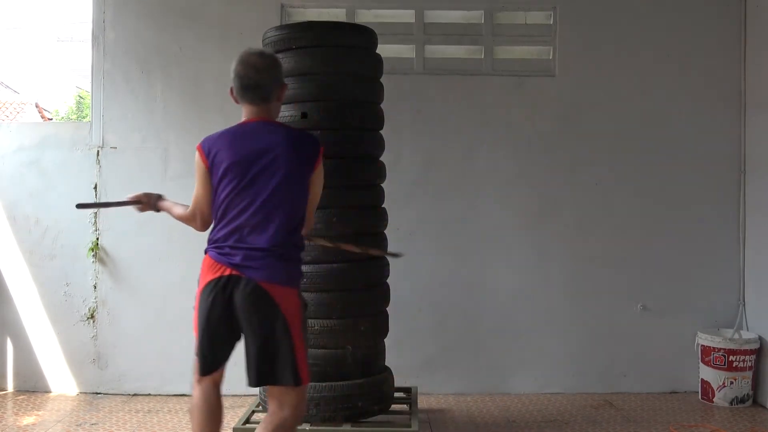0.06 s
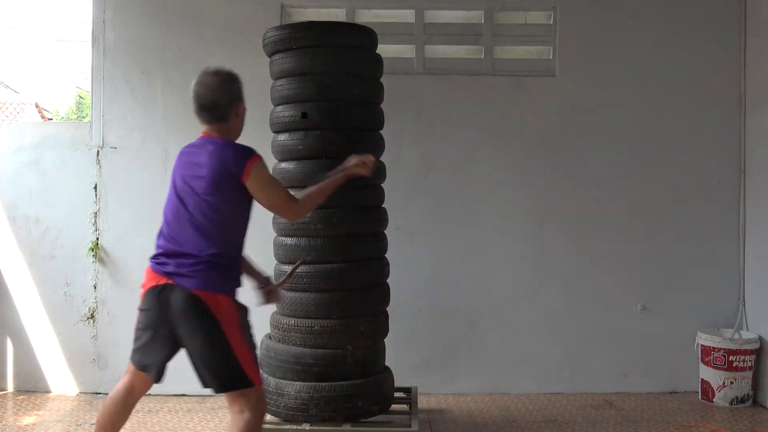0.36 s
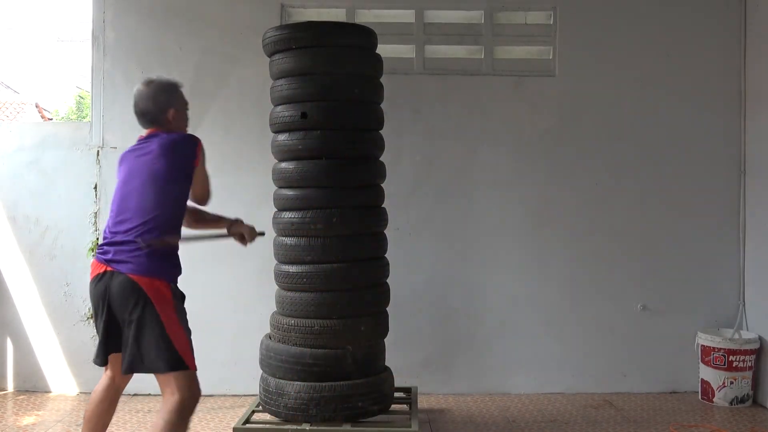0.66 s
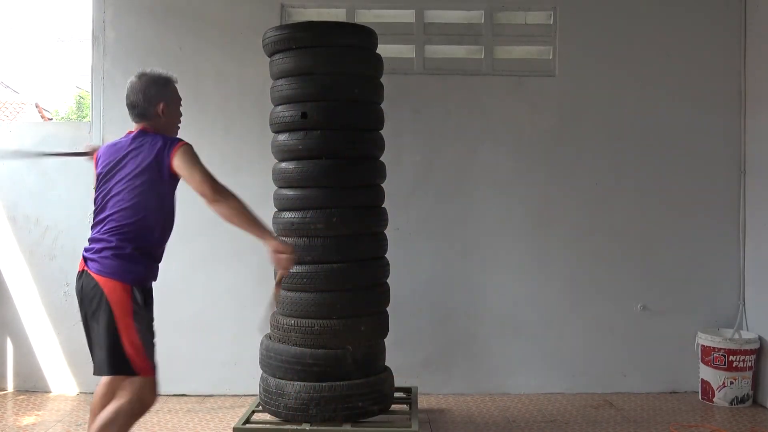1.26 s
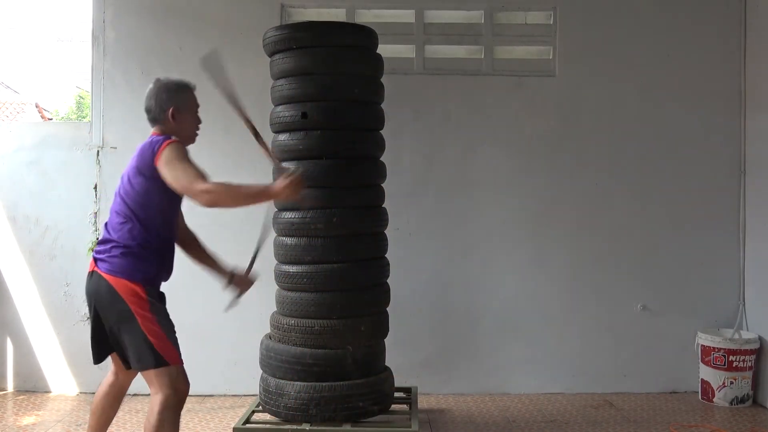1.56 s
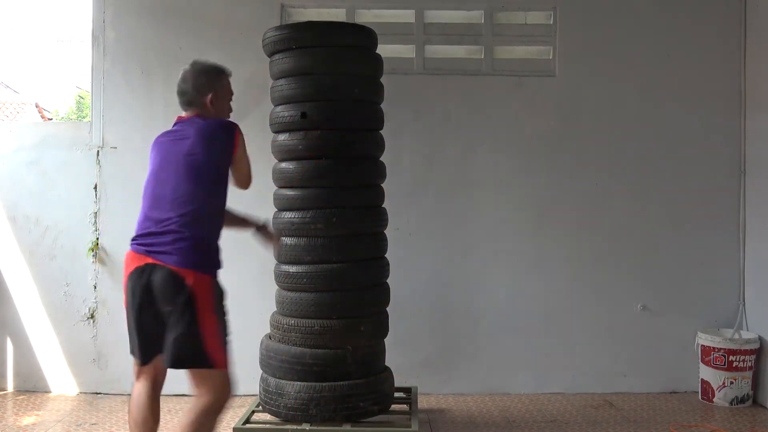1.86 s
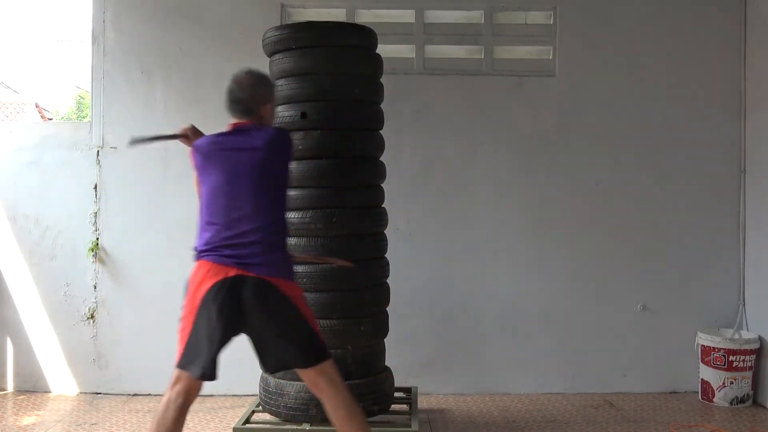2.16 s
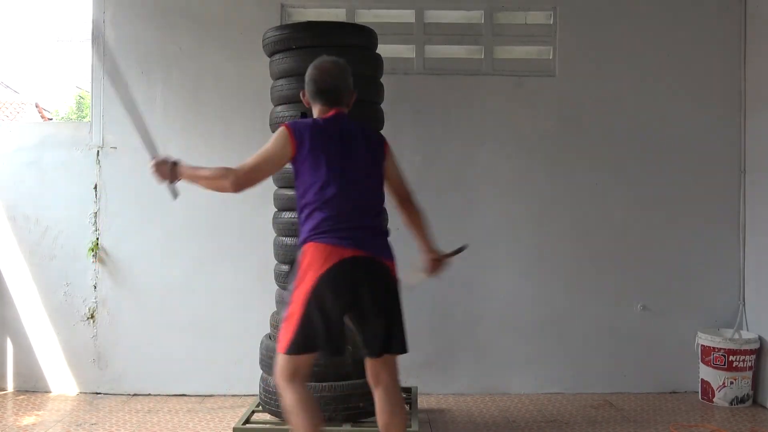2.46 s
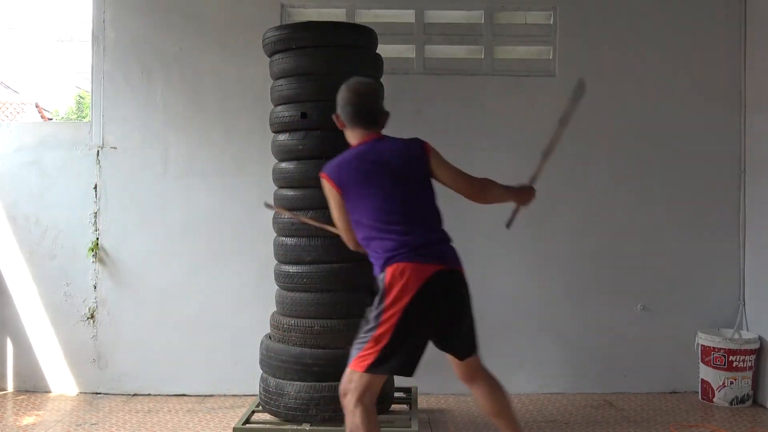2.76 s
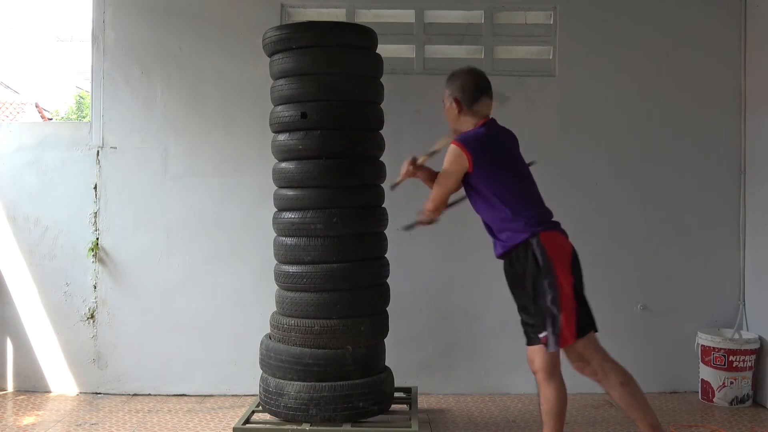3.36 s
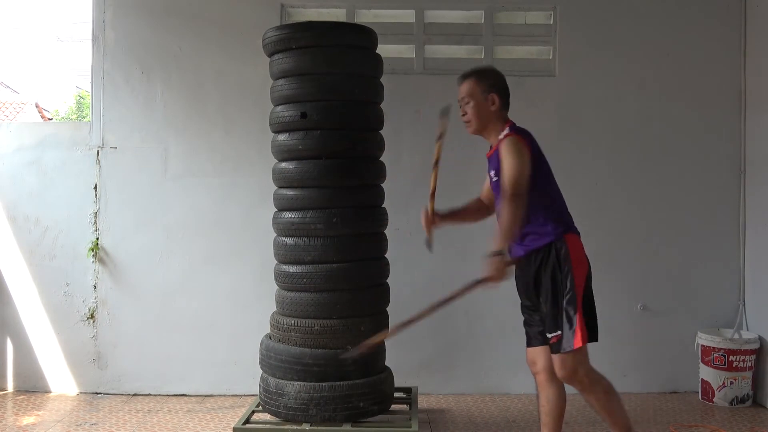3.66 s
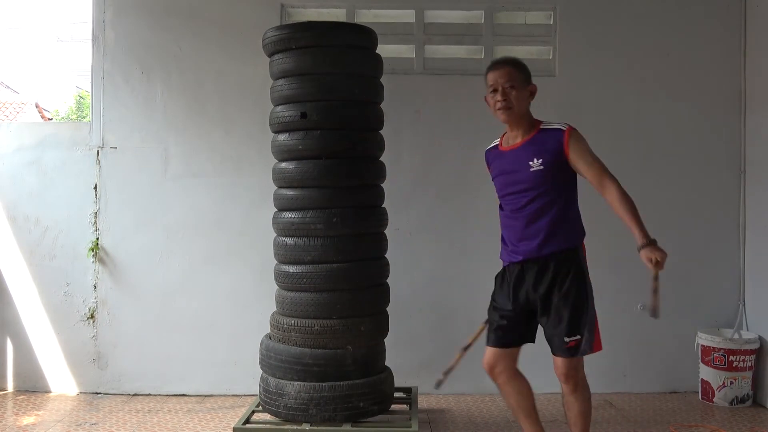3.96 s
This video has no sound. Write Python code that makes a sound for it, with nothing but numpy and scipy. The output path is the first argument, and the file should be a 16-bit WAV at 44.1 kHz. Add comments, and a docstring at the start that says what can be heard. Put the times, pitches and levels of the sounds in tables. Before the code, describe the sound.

Wooden sticks whack a stack of tires about three times a second, with the first blow already ringing at the start. Hits follow at roughly 0.3, 0.6, 0.9, 1.2, 1.5, 1.8, 2.2, 2.5, 2.8, 3.2 and 3.5 seconds. Each is a sharp slap of slightly different tone, echoing for about half a second in a bare room. The last dies away into faint rumble and hiss.

```python
"""Two wooden sticks whack a stack of tires about three times a second in a bare, hard-walled room.
The first blow is already ringing out at the start. Each begins as a short slap of wood on rubber,
coloured by where and how flat the stick lands. Floor and walls return it as separate echoes, then
as a dense wash with a few booming low modes. The wash builds, stays level for a moment as if held
by a limiter, then dies away with the room toward a faint rumble and hiss."""
import sys
import numpy as np
from scipy import signal
from scipy.fft import rfft, irfft
from scipy.io import wavfile
from scipy.ndimage import uniform_filter1d

SR = 44100
rng = np.random.default_rng(int(sys.argv[2]) if len(sys.argv) > 2 else 0)


def digitize_waveform(pressure):
    """Quantize a signal to 16-bit integers and store it at the path in sys.argv[1].

    Rows of a 2-D input are taken as channels; values are limited to [-1, 1].
    """
    field = np.atleast_2d(pressure).T
    bounded = np.clip(field, -1, 1)
    quanta = np.round(bounded * 32767).astype(np.int16)
    wavfile.write(sys.argv[1], SR, quanta)


N = 176400

# The blows. Each row: start in seconds, level in dB, thump in dB, then a frequency in Hz and a gain
# in dB for each of knock, clack, crack, stick ring and treble shelf, then snap gain in dB, rattle
# decay time in seconds, and a factor on the time the wash stays level.
BLOWS = [ (-.055, 2.5, 0.5, 477, -10, 810, -9, 2900, 2, 2770, 3, 4000, -9.5, 0, .001, 0.84),
         (0.2907, 2.24, 1.5, 447, -2, 995, 6, 2680, 2.5, 4280, 3.5, 4470, -5, 3.5, 0.0048, 1.18),
         (0.6092, 1.5, -3, 420, 2.5, 850, -6.5, 2540, 2, 4680, 1, 7550, -9.5, 5.5, 0.0013, 1.52),
         (0.8886, -0.8, -0.5, 660, 3.5, 850, 3.5, 4650, -4, 3700, 2, 8830, -5, 5, 0.00061, 1.02),
         (1.1921, -2, -2, 486, -4.5, 1680, 1.5, 2540, 5.5, 2760, 0, 5300, -4.5, 4, 0.0021, 0.57),
         (1.5115, .8, 2, 336, -3, 1400, 4.5, 3850, -2, 2500, 3.5, 9300, -8, 4.5, 0.0015, 1.38),
         (1.8347, -.5, 4, 406, 8, 1090, -1, 4460, 4, 3320, 3.5, 10400, -5, 2.5, 0.0018, 1.66),
         (2.193, -0.1, -1, 405, -4.5, 1320, -11, 2310, 1.5, 3880, 4, 6770, -3, 2, 0.00071, 0.73),
         (2.4682, -1.2, 4.5, 590, 7, 1000, 8, 5000, 4.5, 3400, 4.5, 7240, -4.5, 5, 0.002, 0.87),
         (2.8088, 0.33, 7, 485, -4.5, 760, 4.5, 3940, 3.5, 3840, 3.5, 7450, -7.5, 3, .0012, 0.93),
         (3.175, 1, -1.5, 460, 1.5, 1210, -3.5, 2600, 4.5, 5320, 1.5, 7400, -4, 1, 0.0019, 1.24),
         (3.5119, 4, -1.5, 397, -11.5, 1390, -7, 2420, 3, 3880, 2.5, 5230, -13, 2.5, 0.0045, 0.44)]
def whacks():
    """Superposition: each blow is the sum of its snap, wash and boom, filtered by its own colour."""
    t = np.arange(40000) / SR
    hz = np.maximum(np.fft.rfftfreq(len(t), 1 / SR), 1)
    out = np.zeros((2, N + 2 * SR))   # a second of margin at each end
    for start_s, level_db, *colour, snap_db, rattle_s, hold_factor in BLOWS:
        snap = from_db(snap_db) * brightness(hz) * rfft(early_echoes(contact(t, rattle_s)))
        spectrum = slap(hz) * (snap + wash(t, hz, hold_factor)) + rfft(boom(t))
        spectrum *= balance(hz) * minimum_phase(level_db + colour_db(hz, *colour))
        blow = irfft(spectrum)[:, :-SR // 20]   # drop the end, where the filters wrap round
        start = SR + int(start_s * SR)
        out[:, start:start + blow.shape[1]] += blow
    return out[:, SR:SR + N]


def contact(t, rattle_s, click_db=-21.5, rattle_db=-20):
    """Impact excitation: the stick clicks, then rattles down on the tread as decaying noise."""
    rattle = rng.standard_normal(len(t)) * np.exp(-np.minimum(t / rattle_s, 20))
    touch = from_db(rattle_db) * rattle / np.linalg.norm(rattle)
    touch[0] += from_db(click_db)
    return touch


# The spectrum of wood on rubber. Each row: frequency in Hz, gain in dB.
SLAP_SPECTRUM = [(30, -11), (55, 1.5), (74, 9.5), (102, 4.5), (135, 17.5), (200, 20.5), (260, 17.5),
                 (450, 20), (620, 19), (850, 16.5), (1300, 18), (2000, 18), (2700, 18), (4000, 18.5),
                 (6000, 17.5), (9000, 12.5), (12500, 6), (14500, 0.5), (16000, -25)]
def slap(hz):
    """Source and filter: one broad frequency response shapes every slap."""
    return minimum_phase(at_hz(SLAP_SPECTRUM, hz))


# The sticks' bending modes, heard in every blow. Each row: frequency in Hz, boost in dB.
BENDING_MODES = [(1750, 0.5), (2400, 0.6), (2700, 1.4), (3300, 1), (3880, 0.94)]
def colour_db(hz, thump_db, knock_hz, knock_db, clack_hz, clack_db, crack_hz, crack_db,
              ring_hz, ring_db, shelf_hz, shelf_db):
    """Resonance: peaks of tire and stick stand between the rubber's low thump and a treble shelf."""
    thump_hz, shelf_steepness, ring_octaves = 254, 12.3, .05
    db = thump_db / (1 + (hz / thump_hz) ** 4)
    db += shelf_db / (1 + (shelf_hz / hz) ** shelf_steepness)
    tire = [(knock_hz, knock_db, .23), (clack_hz, clack_db, .098)]
    stick = [(crack_hz, crack_db, .2), (ring_hz, ring_db, ring_octaves)]
    stick += [(mode_hz, mode_db, ring_octaves) for mode_hz, mode_db in BENDING_MODES]
    for centre_hz, gain_db, width_octaves in tire + stick:
        db += gain_db * np.exp(-.5 * (np.log2(hz / centre_hz) / width_octaves) ** 2)
    return db


# The tilt of the snap. Each row: frequency in Hz, gain in dB.
SNAP_BRIGHTNESS = [(200, -1), (1500, -1), (4000, 0), (8000, 4.5), (14000, 5.5)]
def brightness(hz):
    """Spectral tilt: the direct sound and its first echoes are brighter than the wash."""
    return minimum_phase(at_hz(SNAP_BRIGHTNESS, hz))


# The first echoes off floor and walls. Each row: mean delay in seconds, gain in dB.
REFLECTIONS = [(.0054, -4.5), (.0112, -9), (.0165, -17), (.026, -2)]
def early_echoes(touch, spread=.08):
    """Specular reflection: delayed copies join the contact, their delays varying from blow to blow."""
    return touch + sum(from_db(db) * np.roll(touch, int(delay_s * (1 + spread * rng.uniform(-1, 1)) * SR))
                       for delay_s, db in REFLECTIONS)


# The wash builds, stays level for a moment as if held by a limiter, then dies away with the room.
# Each row: band frequency in Hz, then in seconds the build-up, the hold before each blow's factor,
# and the time to fall 60 dB.
WASH_BANDS = [(60, .03, 0.053, 0.39), (170, 0.033, 0.039, 0.54), (450, 0.0077, 0.058, 0.55),
              (1100, 0.003, 0.058, 0.67), (2980, 0.0075, 0.059, 0.67), (6130, 0.0021, 0.081, 0.6),
              (12000, 0.0017, 0.047, 0.46)]
def wash(t, hz, hold_factor, grain_db=.5, grain_fade_s=.062):
    """Diffuse reflection: the spectrum of countless wall echoes, grainy at first, then smooth."""
    spread = np.log(from_db(grain_db)) * np.exp(-t / grain_fade_s)
    grain = np.exp(spread * np.clip(rng.standard_normal(len(t)), -2, 2) - spread ** 2)
    reflections = rfft(irfft(stereo_noise(hz)) * grain)
    log_centres = np.log(np.array(WASH_BANDS)[:, 0])
    tail = np.zeros((2, len(t)))
    for (_, build_s, hold_s, t60), own_band in zip(WASH_BANDS, np.eye(len(WASH_BANDS))):
        band = irfft(reflections * np.interp(np.log(hz), log_centres, own_band))
        tail += band * wash_envelope(t, build_s, hold_s * hold_factor, t60)
    spectrum = rfft(tail)
    power = uniform_filter1d(np.mean(abs(spectrum) ** 2, axis=0), size=80)
    return spectrum * minimum_phase(-10 * np.log10(power))   # flattened: no broad colour of its own


def wash_envelope(t, build_s, hold_s, t60, delay_s=.003, knee_s=.015):
    """Exponential decay: a band builds, stays level as if held by a limiter, then dies with the room."""
    rise = np.sqrt(1 - np.exp(-np.maximum(t - delay_s, 0) / build_s))
    decaying_s = knee_s * np.logaddexp(0, (t - hold_s) / knee_s)
    envelope = rise * np.exp(-np.log(1000) * decaying_s / t60)
    return envelope / np.linalg.norm(envelope)


# The low modes of stack and room. Each row: frequency in Hz, relative level in dB, swell time in
# seconds, time to fall 60 dB in seconds.
LOW_MODES = [(80.8, -41, 0.034, 0.48), (151.2, -38.5, .03, 0.38), (190, -33, 0.041, 0.61),
             (407.3, -39.5, 0.024, 0.83), (486, -38.5, 0.0097, 0.55), (591, -36, 0.012, .6)]
def boom(t):
    """Normal modes: damped sinusoids swell after the blow and ring on."""
    out = np.zeros(len(t))
    for hz, db, swell_s, t60 in LOW_MODES:
        envelope = (1 - np.exp(-t / swell_s)) * np.exp(-np.log(1000) * t / t60)
        out += from_db(db) * envelope * np.sin(2 * np.pi * (hz * t + rng.random()))
    return out


# The stereo balance of the blows. Each row: frequency in Hz, left minus right in dB.
LEVEL_DIFFERENCE = [(60, 8), (92, 3), (140, 5), (210, 2.5), (330, -3), (500, -3.5), (770, -3), (1170, -0.5),
                    (1790, -0.5), (2740, -1), (4190, -0.5), (6410, -1.5), (9810, -1.0), (15000, 0.5)]
def balance(hz):
    """Level difference between channels: the bass leans left, the low middle right."""
    return from_db(at_hz(LEVEL_DIFFERENCE, hz) * [[.5], [-.5]])


# The likeness of left and right. Each row: frequency in Hz, correlation from 0 to 1.
COHERENCE = [(60, 1), (300, 0.98), (740, 0.99), (2000, 1), (3500, 0.99), (5500, .93), (8500, 0.71),
             (10500, 0.78), (12000, 1)]
def stereo_noise(hz):
    """Partial coherence: left and right spectra of white noise, alike except in the treble."""
    mid, side = rfft(rng.standard_normal((2, 2 * (len(hz) - 1))))
    alike = np.clip(at_hz(COHERENCE, hz), 0, 1)
    return np.sqrt((1 + alike) / 2) * mid + np.sqrt((1 - alike) / 2) * side * [[1], [-1]]


# The still air of the room. Each row: frequency in Hz, gain on white noise in dB.
AIR_SPECTRUM = [(25, -55), (80, -41), (200, -49), (1000, -59), (5000, -53), (15000, -67)]
def air():
    """Stationary noise: the faint steady rumble and hiss of the room."""
    hz = np.fft.rfftfreq(N, 1 / SR)
    return irfft(stereo_noise(hz) * from_db(at_hz(AIR_SPECTRUM, hz)))


def minimum_phase(db):
    """Causality: folding the cepstrum gives a response with these gains that sounds nothing early."""
    cepstrum = irfft(np.log(from_db(db)))
    half = len(cepstrum) // 2
    cepstrum[1:half] *= 2
    cepstrum[half + 1:] = 0
    return np.exp(rfft(cepstrum))


def at_hz(points, hz):
    """Interpolation of a table on a logarithmic frequency axis."""
    table_hz, values = np.array(points).T
    return np.interp(np.log(hz + 1e-9), np.log(table_hz), values)


def from_db(db):
    """The decibel scale: 20 dB is a factor of ten in amplitude."""
    return 10 ** (np.asarray(db) / 20)


def scene():
    """Superposition: the blows add to the room's steady air."""
    return whacks() + air()


def record(dry, ceiling=.5, cutoff_hz=15800):
    """Saturation rounds the highest peaks, then a low-pass filter cuts the top."""
    rounded = ceiling * np.tanh(dry / ceiling)
    return signal.sosfilt(signal.ellip(10, .1, 70, cutoff_hz, fs=SR, output="sos"), rounded)


dry = scene()
out = record(dry)
digitize_waveform(out)
```